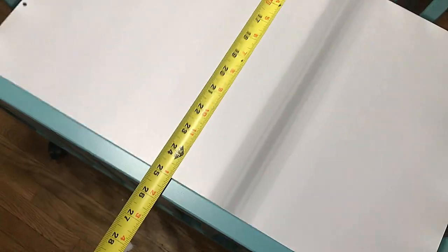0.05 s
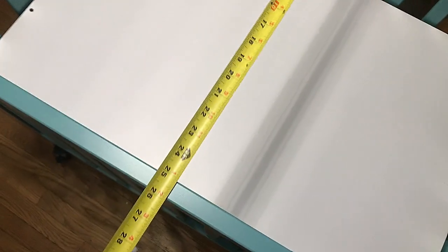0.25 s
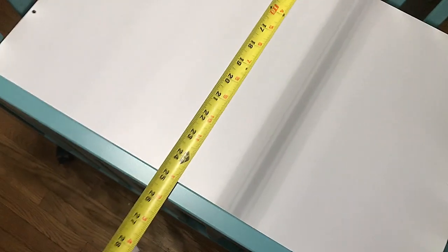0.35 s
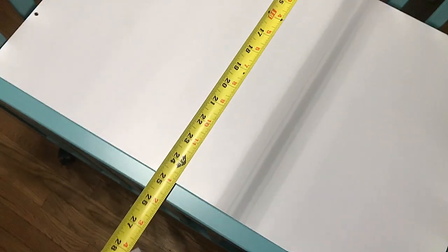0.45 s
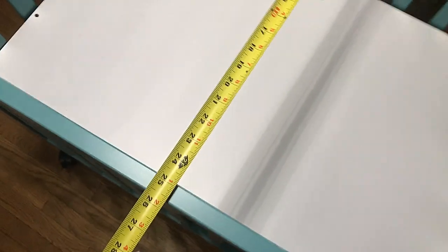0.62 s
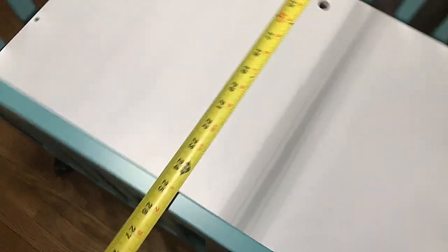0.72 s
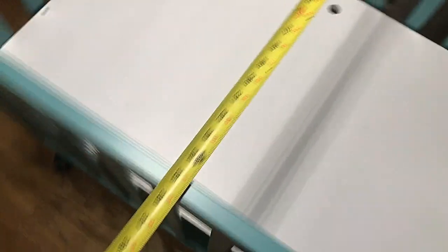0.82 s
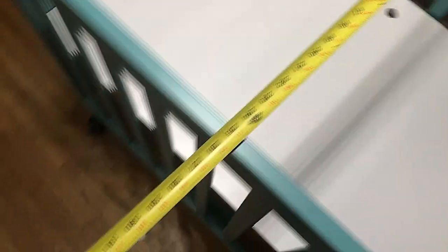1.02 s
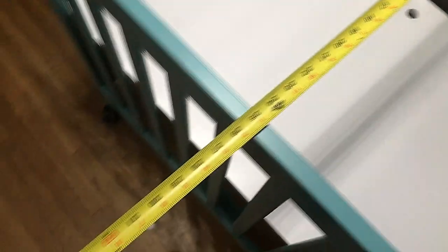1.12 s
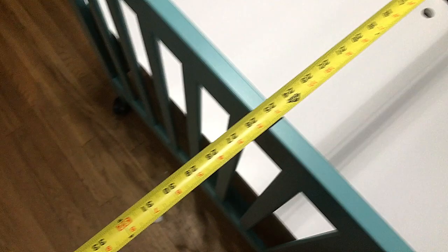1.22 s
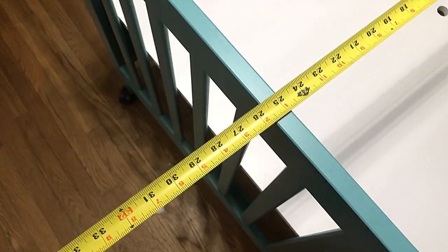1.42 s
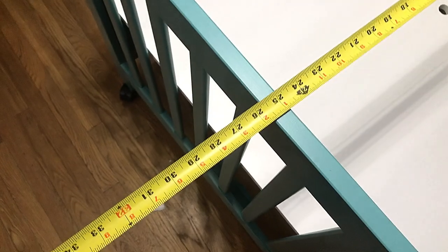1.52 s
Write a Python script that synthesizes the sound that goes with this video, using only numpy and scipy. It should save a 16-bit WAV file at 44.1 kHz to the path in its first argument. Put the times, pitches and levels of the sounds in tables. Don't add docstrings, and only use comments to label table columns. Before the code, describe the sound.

A steel tape measure blade snaps hard against a wooden rail, rattles brightly, taps once more, then leaves faint ticks and a tiny scrape. Small quiet room, close handheld microphone with soft hiss and low handling rumble.

```python
import sys
import numpy as np
from scipy import signal
from scipy.fft import rfft, irfft, next_fast_len
from scipy.io import wavfile
from scipy.ndimage import uniform_filter1d, map_coordinates

SR = 44100
rng = np.random.default_rng(int(sys.argv[2]) if len(sys.argv) > 2 else 0)


def file_out(sig):
    cols = np.atleast_2d(sig).T
    lim = np.clip(cols, -1, 1)
    pcm = np.round(lim * 32767).astype(np.int16)
    wavfile.write(sys.argv[1], SR, pcm)


def invert_db(x):
    u = np.asarray(x, float) / 20
    return 10 ** u


N = 68355


def unit(x):
    return x / np.sqrt(np.mean(x ** 2) + 1e-20)


def along(points, hz):
    f, v = np.transpose(points)
    return np.interp(np.log(hz + 1), np.log(f + 1), v)


def curve(rows):
    s, level = np.transpose(rows)
    return np.interp(np.arange(N) / SR, s, level)


def gated(rows):
    opening, closing = (rows[0][0] - .001, -110), (rows[-1][0] + .003, -110)
    return curve([opening, *rows, closing])


def wobble(rate):
    knots = rng.standard_normal(int(N * rate / SR) + 4)
    return map_coordinates(knots, [np.arange(N) * rate / SR])


def filtered(x, response):
    m = next_fast_len(len(x) + SR // 4)
    return irfft(rfft(x, m) * response(np.fft.rfftfreq(m, 1 / SR)), m)[:len(x)]


def coloured(table):
    return filtered(rng.standard_normal(N), lambda f: invert_db(along(table, f)))


def peaks(modes):
    def response(f):
        total = 0
        for k, (centre, width, db) in enumerate(modes):
            damping = 1j * f * width
            total = total + (-1) ** k * invert_db(db) * damping / (centre ** 2 - f ** 2 + damping)
        return total
    return response


def narrow(hz, width):
    return lambda f: peaks([(hz, width, 0)])(f) ** 2


def steel(colour, modes, share_db):
    def response(f):
        broad, strong = invert_db(along(colour, f)), peaks(modes)(f)
        return broad / np.linalg.norm(broad) + invert_db(share_db) * strong / np.linalg.norm(strong)
    return response


def add(track, s, sound):
    part = track[round(s * SR):][:len(sound)]
    part += sound[:len(part)]


def grains(body):
    grains_per_s, spread_db = 6000, 2.5
    chance, side, size = rng.random((3, N))
    hits = (chance < grains_per_s / SR) * np.sign(side - .5) * invert_db(-spread_db * np.log(size + .03))
    return unit(filtered(hits, body)) * invert_db(1.2 * wobble(110))


def strikes(rows, modes, mode_db, crack_db):
    click_db, crack_t60_s = -5, 0.01
    out, t = np.zeros(N), np.arange(SR // 8) / SR
    for s, db, t60, hz, spread in rows:
        band = lambda f: np.exp(-.5 * (np.log2((f + 1) / hz) / spread) ** 2)
        sheet = lambda f: band(f) * (1 + invert_db(mode_db) * peaks(modes)(f))
        shake = unit(filtered(rng.standard_normal(len(t)), sheet))
        fade = invert_db(-60 * t / t60) + invert_db(crack_db - 60 * t / crack_t60_s)
        attack = np.minimum(1, t * hz)
        click = filtered((np.arange(len(t)) == round(SR / hz)) * 1., band)
        add(out, s, invert_db(db - 9) * shake * fade * attack + invert_db(db + click_db) * click / click.max())
    return out


# (frequency [Hz], level [dB per Hz])
HISS = [(88, -42.5), (150, -11), (397, -8.5), (756, -17), (3140, -23), (7500, -27), (10300, -33.5),
        (12400, -28.5), (15800, -28)]


def hiss():
    return invert_db(-67.5) * unit(coloured(HISS))


# (centre [Hz], width [Hz], level [dB])
HUMS = [(1690, 420, -72.5), (5500, 1100, -78), (998, 38, -80.5), (401.4, 43, -76.5)]


def hums():
    out = np.zeros(N)
    for hz, width, db in HUMS:
        out += invert_db(db) * unit(filtered(rng.standard_normal(N), narrow(hz, width)))
    return out


def motor():
    start_s, pairs_per_s, gap_s, second_db = .0164, 60, 1 / 300, -11
    at = np.arange(start_s, N / SR - gap_s, 1 / pairs_per_s)
    size = invert_db(1.6 * rng.standard_normal((len(at), 2)))
    kicks = np.zeros(N)
    kicks[(at * SR).astype(int)] = size[:, 0]
    kicks[((at + gap_s) * SR).astype(int)] = invert_db(second_db) * size[:, 1]
    ticks = invert_db(-36) * filtered(kicks, narrow(5700, 1700))

    whine_start_s = .003
    turns = 2 * pairs_per_s * (np.arange(N) / SR - whine_start_s)
    pulses = np.diff(np.floor(turns), prepend=-1) * invert_db(1.5 * wobble(100))
    pulses = pulses + .03 * rng.standard_normal(N)
    return ticks + invert_db(-81) * unit(filtered(pulses, narrow(8420, 260)))


# (time [s], level [dB])
HANDLING = [(0, -51), (.04, -46.5), (.17, -54.5), (.3, -48), (.4, -54.5), (.52, -44), (.6, -53), (.69, -53),
            (.74, -53), (.82, -46), (.95, -41), (1.01, -52), (1.08, -52), (1.17, -44.5), (1.22, -51.5),
            (1.3, -46), (1.41, -50), (1.55, -52.5)]
# (time [s], level [dB])
RUBBING = [(0, -68.5), (.42, -66.5), (.44, -52.5), (.6, -68.5), (.66, -57.5), (.74, -75.5), (.81, -61),
           (.86, -58), (.885, -49), (.935, -55.5), (.96, -55.5), (1.005, -46), (1.03, -52), (1.05, -70),
           (1.28, -63.5), (1.32, -68), (1.42, -78), (1.55, -70)]
# (frequency [Hz], level [dB per Hz])
RUMBLE = [(11, -62), (18, -8), (46, -2.5), (75, -18), (108, -20), (140, -26), (180, -67.5), (310, -120)]
# (frequency [Hz], level [dB per Hz])
RUB = [(53, -37), (90, -5), (275, -6), (649, -25), (728, -32), (900, -27.5), (1170, -35), (1980, -120)]


def handling():
    def even(x, size):
        return unit(x / np.sqrt(np.abs(uniform_filter1d(x * x, size)) + 1e-12))
    opening_dip_db = -30 * np.exp(-np.arange(N) / SR / .006)
    rumble = invert_db(curve(HANDLING) + opening_dip_db) * even(coloured(RUMBLE), size=3000)
    rub = invert_db(curve(RUBBING) + 2.5 * wobble(56)) * even(coloured(RUB), size=900)
    return rumble + rub


# (time [s], level [dB])
SCRAPE = [
    [(0, -73), (.04, -73), (.065, -66.5), (.11, -80), (.18, -79), (.205, -70), (.226, -67)],
    [(.428, -39), (.46, -50.5), (.51, -60), (.6, -60.5), (.65, -62), (.75, -70), (.79, -74), (.88, -65.5),
     (.96, -83)],
]
# (centre [Hz], width [Hz], level [dB])
SCRAPE_MODES = [(1437, 450, 11.5), (1800, 43, -26.5), (3540, 22, 18.5), (3960, 54, 18), (5210, 120, 13.5)]
# (frequency [Hz], level [dB per Hz])
SCRAPE_COLOUR = [(240, -40), (500, -15.5), (1530, -9), (3740, -9.5), (5500, -4.5), (7600, -20.5),
                 (15900, -53)]


def scrape():
    strength = sum(invert_db(gated(rows) + 1.5) for rows in SCRAPE)
    return strength * grains(steel(SCRAPE_COLOUR, SCRAPE_MODES, share_db=-13))


# (time [s], peak level [dB], ring t60 [s], centre [Hz], spread [octaves])
TAPS = [(.0805, -43, .06, 4000, .3), (.4716, -35, .04, 3700, .5), (.52, -52, .06, 3635, .05),
        (.5303, -38, .09, 3800, .55), (.5606, -44, .06, 3100, .55), (.587, -45, .07, 3700, .55),
        (.621, -49, .025, 6500, .45), (.6673, -49, .06, 3100, .4), (.697, -53, .06, 3600, .1),
        (.7237, -47, .08, 3200, .4), (.741, -54, .03, 1800, .5), (.9016, -54, .03, 5600, .3)]


def light_taps():
    return strikes(TAPS, SCRAPE_MODES, mode_db=7.2, crack_db=4.8)


# (time [s], peak level [dB], ring t60 [s], centre [Hz], spread [octaves])
BLOWS = [(.2308, -7.5, 0.007, 5570, 0.65), (0.233, -16, 0.028, 2740, 1.36),
         (.2341, -11.5, 0.023, 5800, 0.19), (.2368, -5.5, .012, 3980, 0.21),
         (0.2412, -17, 0.12, 4680, 0.46), (.2458, -7, 0.008, 4350, 0.43), (.2548, -36, .03, 5150, .3),
         (.2605, -18, .03, 5400, .4), (.2675, -16.5, 0.064, 4300, 0.75), (.2795, -22.5, 0.09, 4700, 0.54),
         (.2915, -20, 0.034, 5200, 0.076), (.2958, -35, 0.0054, 5550, 0.37),
         (0.306, -25.5, 0.033, 5700, 0.5), (.308, -27.5, 0.089, 3760, 0.25), (.329, -28, 0.02, 6500, 0.23),
         (.345, -40, 0.026, 6500, 0.54), (.3695, -45, .04, 5500, .3), (.38, -42.5, 0.058, 3280, 0.13),
         (.3865, -38, 0.043, 5700, 0.21), (0.4242, -28, 0.015, 6540, 0.76),
         (.4268, -17.5, 0.021, 5160, 0.45), (.4362, -38, 0.043, 5500, 0.29), (.4475, -40, .04, 4030, 0.11),
         (.427, -39.5, 0.22, 556, 0.59)]
# (centre [Hz], width [Hz], level [dB])
BLADE = [(1687, 140, -15), (3670, 180, -9), (3840, 16, -5), (4060, 70, -1), (4590, 26, -2), (5120, 63, 0),
         (5260, 15, -3), (5760, 40, -7), (6090, 52, -7), (6520, 27, -9), (6910, 52, -6), (7360, 33, -12),
         (7890, 55, -12), (8240, 90, -15)]


def blows():
    return strikes(BLOWS, BLADE, mode_db=16.3, crack_db=1)


# (time [s], level [dB])
RATTLE = [
    (.2315, -22.5),
    (.247, -24.5),
    (.25, -27),
    (.29, -33.5),
    (.334, -38.5),
    (.355, -43.5),
    (.365, -49),
    (.4, -63),
    (.418, -49),
]
# (frequency [Hz], level [dB per Hz])
BLADE_COLOUR = [(250, -17.5), (800, -22.5), (1500, -16.5), (3200, -13.5), (4100, -1.5), (5600, -0.5),
                (9000, -21.5), (15900, -25)]


def rattle():
    return invert_db(gated(RATTLE) - 0.5) * grains(steel(BLADE_COLOUR, BLADE, share_db=-5))


# (time [s], peak level [dB], pitch [Hz], t60 [s], pitch fall [1/s])
KNOCKS = [(.235, -40, 420, .02, .5), (.3563, -21, 390, .012, 35), (.361, -36, 100, .05, 14.5),
          (.949, -52, 1030, .02, .5), (1.022, -37, 115, .14, 19), (1.094, -48, 227, .03, 3),
          (.642, -42, 72, .3, 1.3), (.682, -42, 61, .14, 1.3), (.48, -52, 150, .6, .1),
          (.245, -50, 135, .27, .1), (1.337, -47, 700, .008, .5), (1.3372, -52, 1300, .007, .5),
          (1.477, -56, 880, .012, .5), (.895, -45, 105, .2, .5)]


def knocks():
    out, t = np.zeros(N), np.arange(SR // 4) / SR
    for s, db, hz, t60, fall in KNOCKS:
        turns = hz * np.log1p(fall * t) / fall
        attack = 1 - np.exp(-t * hz * 1.5)
        add(out, s, 2.12 * invert_db(db - 60 * t / t60) * np.sin(2 * np.pi * turns) * attack)
    return out


# (time [s], level [dB])
TAP = (.4243, -20)
# (centre [Hz], width [Hz], level [dB])
TAP_RING = [(3675, 200, 2), (4230, 134, 5), (8550, 620, -10), (9200, 190, -40), (13340, 300, -12)]


def second_tap():
    s, db = TAP
    out = np.zeros(N)
    ring = filtered((np.arange(SR // 8) == 0) * 1., peaks(TAP_RING))
    add(out, s, invert_db(db) * ring / np.abs(ring).max())
    return out


# (time [s], peak level [dB], t60 [s], centre [Hz], spread [octaves])
TICKS = [
    (1.098, -56, .08, 4800, .4),
    (1.0995, -55, .05, 2600, .7),
    (1.281, -55, .02, 2200, .4),
    (1.3372, -57, .02, 2500, .45),
    (.5305, -41, .06, 2700, .6),
    (.5872, -44, .05, 2500, .6),
]


def finger_ticks():
    return strikes(TICKS, SCRAPE_MODES, mode_db=-22, crack_db=6.4)


# (centre [Hz], width [Hz], level [dB])
CHATTER_MODES = [(3900, 320, 5), (5750, 110, 8), (6750, 380, 3), (8500, 500, -7), (1500, 290, 0),
                 (11500, 820, -13)]
# (frequency [Hz], level [dB per Hz])
CHATTER_COLOUR = [(470, -42), (800, -5), (1410, -2), (2350, -8), (3930, 1), (6570, -1), (7540, -18),
                  (16000, -25)]


def chatter():
    start_s, length_s, level_db, swell_db = .8018, .068, -56, 4
    slips_per_s, speed_up = 146, 68000
    t = np.arange(round(length_s * SR)) / SR
    turns = slips_per_s * t + speed_up * t ** 4
    slipping = turns < 10
    slips = (np.diff(np.floor(turns), prepend=-1) > 0) * slipping * invert_db(19 + wobble(200)[:len(t)])
    friction = rng.standard_normal(len(t)) * (.4 + .7 * slipping * invert_db(-30 * (turns % 1)))
    stroke = invert_db(swell_db * t / t[-1]) * np.minimum(1, (t[-1] - t) / .008)
    out = np.zeros(N)
    add(out, start_s, (slips + friction) * stroke)
    out = filtered(out, steel(CHATTER_COLOUR, CHATTER_MODES, share_db=5))
    return invert_db(level_db) * unit(out) * np.sqrt(len(t) / N)


# (frequency [Hz], t60 [s])
ROOM = [(200, 0.87), (2000, 0.31), (6000, 0.1), (14000, 0.088)]


def room(x):
    hz, t, z = signal.stft(rng.standard_normal(SR // 2), SR, nperseg=256)
    fade = invert_db(-60 * t / along(ROOM, hz)[:, None])
    tail = signal.istft(z * fade, SR, nperseg=256)[1]
    delayed = np.pad(x, (200, 0))
    return signal.fftconvolve(delayed, tail / np.linalg.norm(tail))[:N]


def scene():
    tape = blows() + light_taps() + finger_ticks() + second_tap() + rattle() + scrape() + chatter()
    in_room = tape + invert_db(-12) * room(tape)
    close_by = knocks() + handling() + hiss() + hums() + motor()
    return (in_room + close_by)[None]


def low_pass(x):
    return signal.sosfilt(signal.butter(12, 16790, fs=SR, output="sos"), x)


def record(dry):
    top_hz = 15900
    edge = lambda f: np.clip((top_hz + 150 - f) / 400, 0, 1) ** 2
    mix = filtered(dry[0], edge)[None]
    return low_pass(mix)


dry = scene()
out = record(dry)
file_out(out)
```